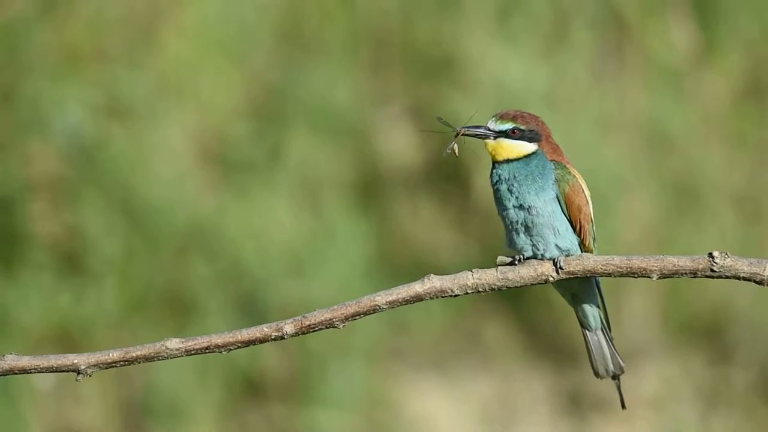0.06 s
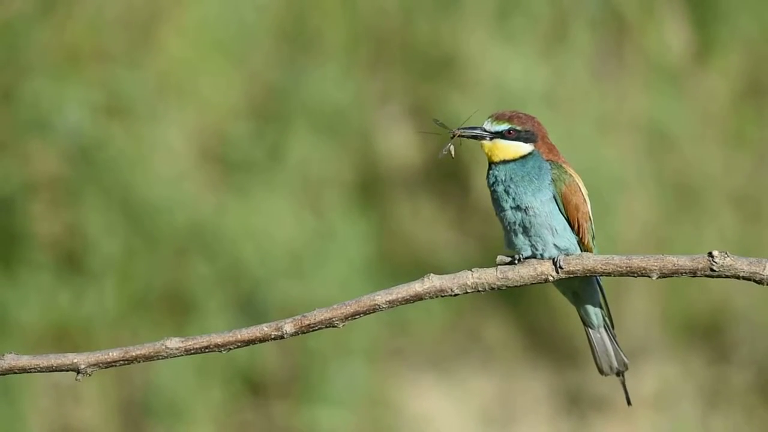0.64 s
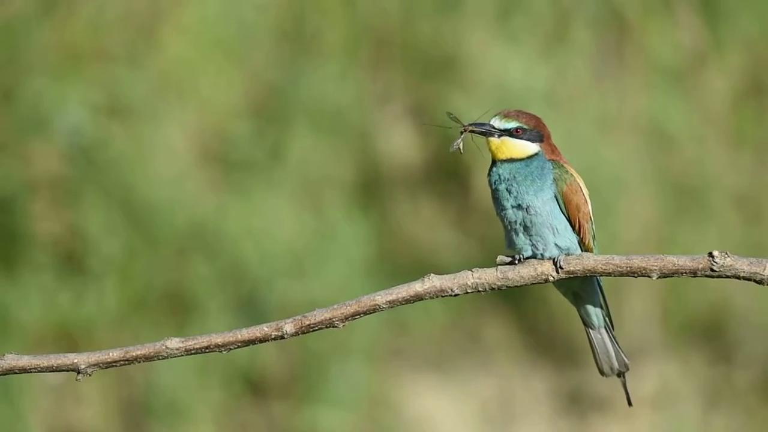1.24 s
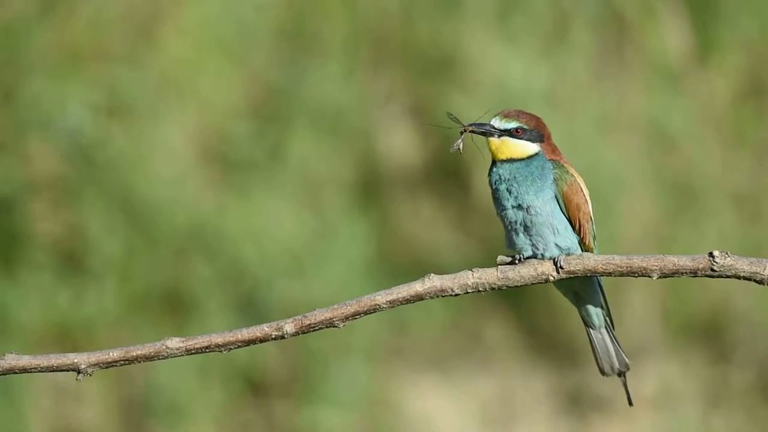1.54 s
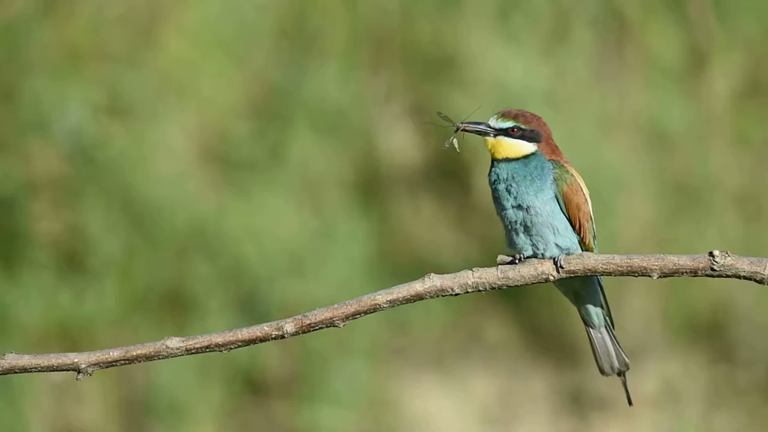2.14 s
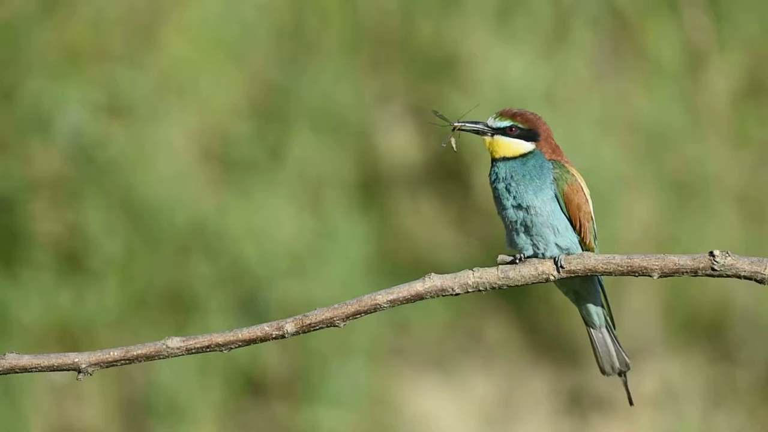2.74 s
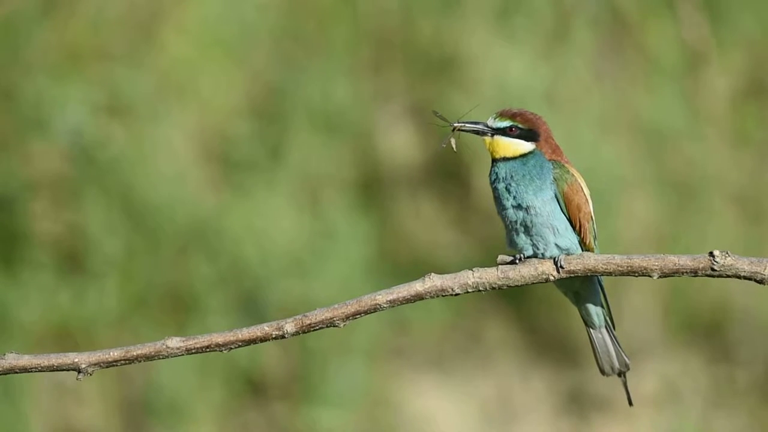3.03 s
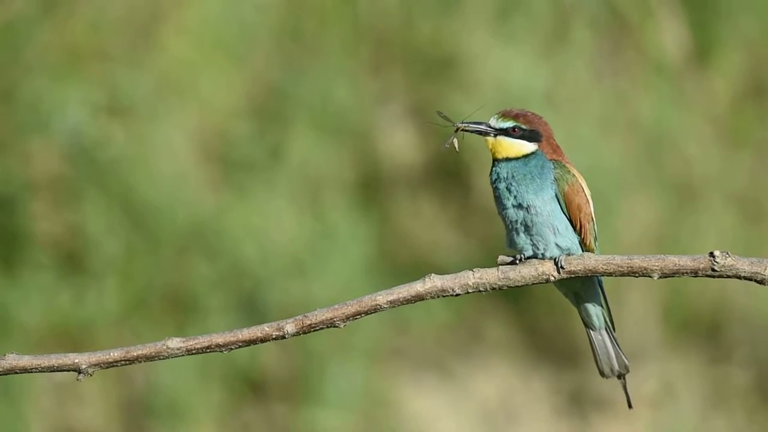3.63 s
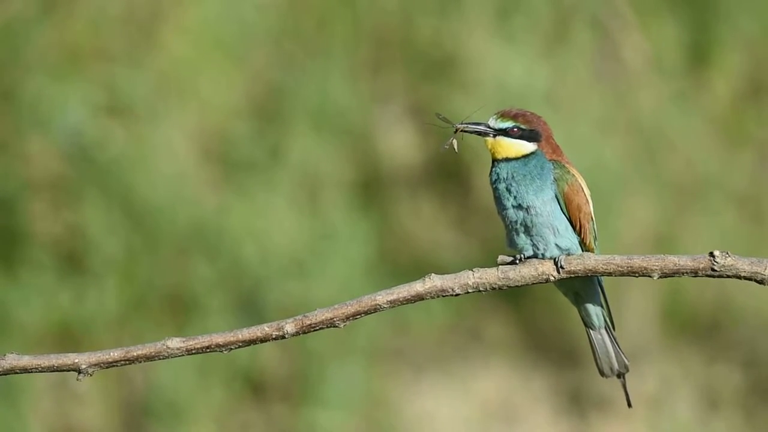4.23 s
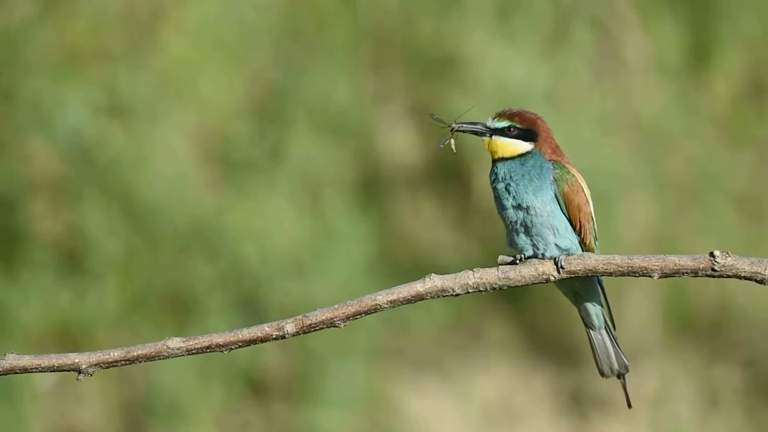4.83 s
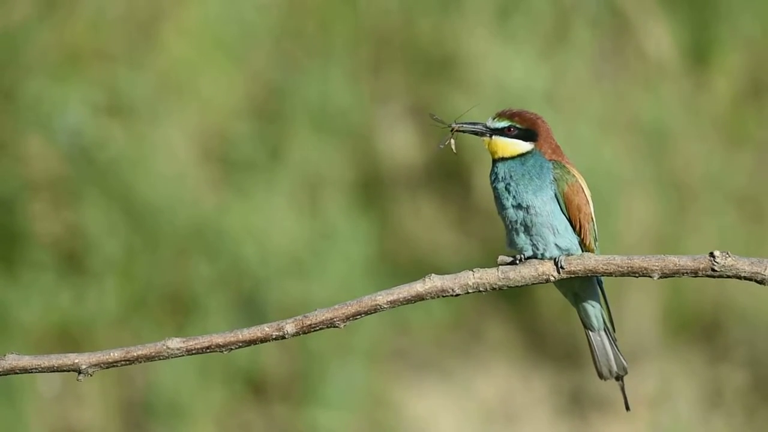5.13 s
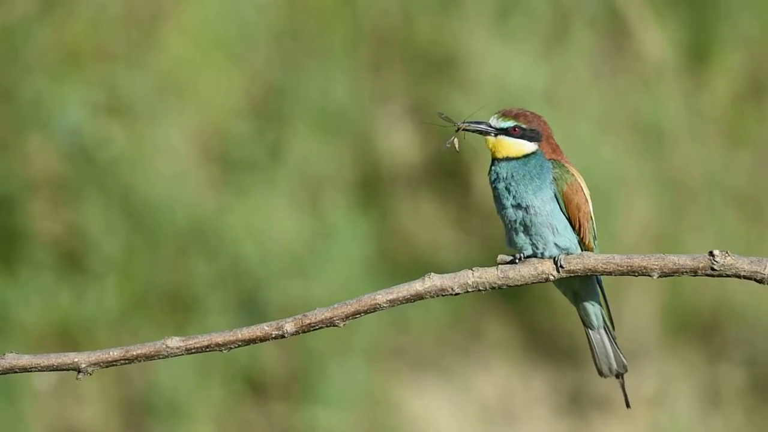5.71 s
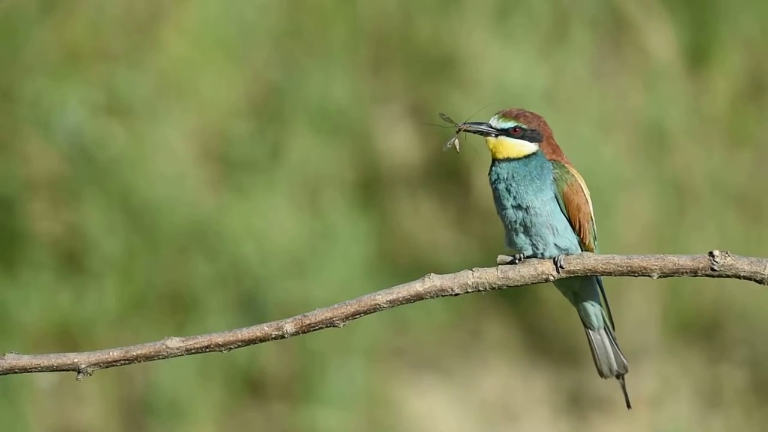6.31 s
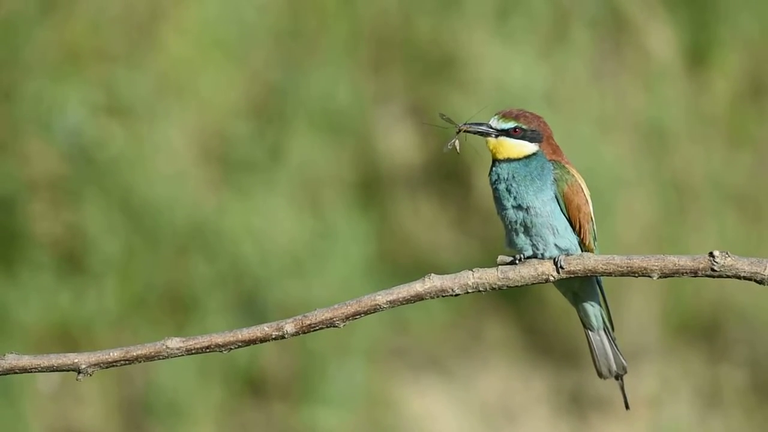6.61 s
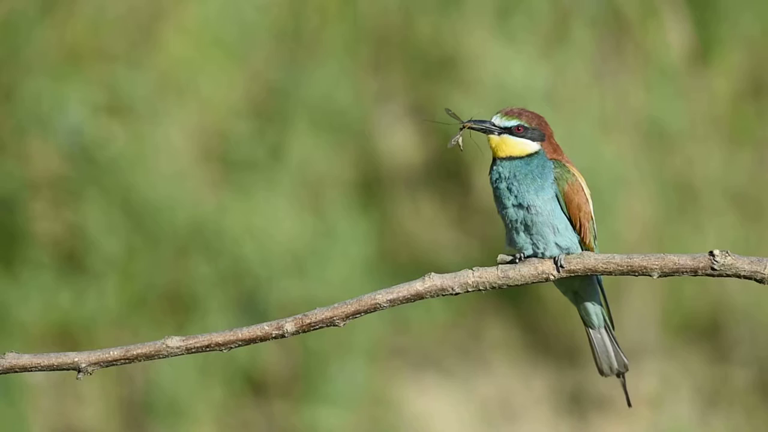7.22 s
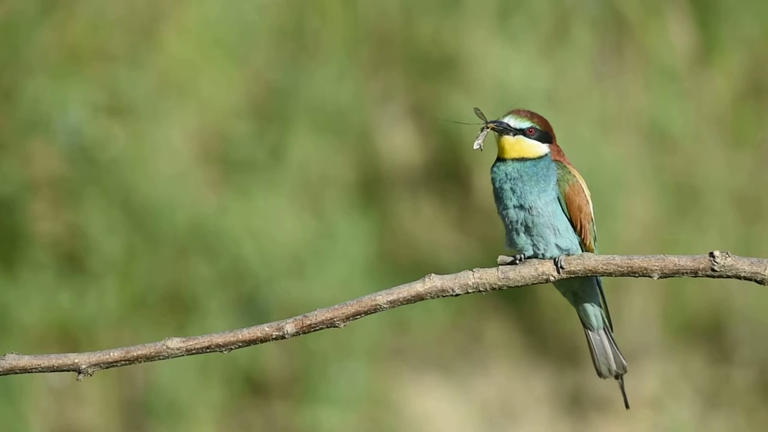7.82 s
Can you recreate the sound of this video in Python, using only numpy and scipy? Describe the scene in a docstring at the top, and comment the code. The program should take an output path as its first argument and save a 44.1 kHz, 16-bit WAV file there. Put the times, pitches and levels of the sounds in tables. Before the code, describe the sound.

A soft hiss of outdoor air and a low, distant rumble continue throughout. Bee-eaters nearby give short, nearly pure whistles that climb, flick upward and drop, each with a slight echo from the bushes. A faint call opens, a small dry snap sounds at 0.5 seconds, and clearer calls follow at about 0.7, 0.8, 1.4 and 1.6 seconds. A few tiny pips mix in between 2 and 2.4 seconds. The calls are then loudest and most regular, three or four a second, until about 4.8 seconds. After a pause, softer calls return from 5.9 to 6.6 seconds, with a strong one at 7. Small birds chirp, twitter and buzz faintly farther off, adding thin rising chirps around 4.3 and 5.5 seconds and high dropping whistles near 6.2, 7.1 and 7.9. Leaves rustle lightly around 3 and 5.5 seconds.

```python
"""Short, arching whistles ring out over a soft hiss and a low, distant rumble in open country.
They come from bee-eaters near a perch: each call is a nearly pure tone that climbs, flicks up
once or twice and drops. Small birds chirp and buzz farther off, something snaps once, and a
breeze rustles the leaves. The ground and the bushes scatter the calls back as echoes."""
import sys
import numpy as np
from scipy import signal
from scipy.fft import rfft, irfft
from scipy.io import wavfile

SR = 44100
rng = np.random.default_rng(int(sys.argv[2]) if len(sys.argv) > 2 else 0)


def output_pcm(signal):
    """Save a mono or channel-first signal as 16-bit PCM at the path in sys.argv[1].

    Samples are clipped to [-1, 1] before scaling.
    """
    pcm = np.clip(np.atleast_2d(signal).T, -1, 1) * 32767
    wavfile.write(sys.argv[1], SR, np.round(pcm).astype(np.int16))


N = 355446


def amp(db):
    """Turns decibels into a number to multiply a sound by."""
    return 10 ** (np.asarray(db) / 20)


def value_at(points, hz):
    """Looks up a value between the rows of a table, with every octave spaced alike."""
    row_hz, values = np.transpose(points)
    return np.interp(np.log(hz + 1), np.log(row_hz + 1), values)


def add(mix, start_s, sound):
    """Adds a sound to the mix at its start time."""
    part = mix[max(round(start_s * SR), 0):][:len(sound)]
    part += sound[:len(part)]


def noise(gain):
    """Noise of typical size 1; the function gain(hz) says how strong each frequency is."""
    shaped = irfft(rfft(rng.standard_normal(N)) * gain(np.fft.rfftfreq(N, 1 / SR)), N)
    return shaped / np.sqrt(np.mean(shaped ** 2) + 1e-20)


def wander(rate_hz):
    """A smooth random wobble of typical size 1, moving at up to about rate_hz."""
    return noise(lambda hz: np.exp(-(hz / rate_hz) ** 2))


def fade(t, length_s, edge_s):
    """Fades a note in and out, taking edge_s at each end."""
    return np.clip(np.minimum(t, length_s - t) / edge_s, 0, 1)


def phase_of(hz):
    """Adds up a changing pitch into the angle of a sine wave."""
    return 2 * np.pi * np.cumsum(hz) / SR


def still_air(level_db=-57.5, sway_db=0.05):
    """Outdoor air: a nearly steady hiss, stronger in the low notes."""
    # tone of the air: frequency_hz, relative_db
    tone = [(76, -36), (130, -1.5), (186, -5.5), (415, -9.5), (584, -10.5), (632, -11), (1000, -12),
            (1250, -13), (1500, -14.5), (1830, -15.5), (4500, -23), (5830, -25.5), (15600, -39)]
    # faint narrow bands in the hiss: frequency_hz, width_hz, lift_db
    bands = [(8440, 310, 3), (12150, 390, 3), (15500, 300, 4)]

    def gain(hz):
        lift_db = sum(db * np.exp(-((hz - middle) / width) ** 2) for middle, width, db in bands)
        return amp(value_at(tone, hz) + lift_db)

    return noise(gain) * amp(level_db + sway_db * wander(8.5))


def distant_rumble(rumble_db=-54.5, drone_db=-64.5, drone_hz=73.8, drone_width_hz=7.1):
    """Deep noise, with one narrow band that is heard as a wavering drone."""
    # tone of the rumble: frequency_hz, relative_db
    tone = [(12, -28), (27, -14), (45, -3), (65, -3.5), (75, 1), (82, -5.5), (92, 0.5), (105, -9),
            (135, -14.5), (180, -28), (400, -65)]
    rumble = noise(lambda hz: amp(value_at(tone, hz)))
    drone = noise(lambda hz: 1 / (1 + ((hz - drone_hz) / drone_width_hz) ** 2))
    return amp(rumble_db) * rumble + amp(drone_db) * drone


def leaves(flicker_db=1.0):
    """Leaves make a bright, flickering rustle that grows when the breeze lifts."""
    # loudness of the breeze in the leaves: time_s, level_db
    breeze = [(0, -79), (2.7, -82), (2.95, -67.5), (3.1, -61.5), (3.3, -70), (3.55, -67), (3.8, -70.5),
              (4.1, -80), (5.2, -77), (5.5, -64), (5.8, -66), (6.1, -75), (6.55, -84), (6.66, -66),
              (6.8, -77), (8.06, -82)]
    # tone of the rustle: frequency_hz, relative_db
    tone = [(500, -23), (2500, 5), (6500, -1), (9000, -4), (13000, -11), (16000, -30)]
    breeze_db = np.interp(np.arange(N) / SR, *np.transpose(breeze))
    rustle = noise(lambda hz: amp(value_at(tone, hz)))
    return amp(breeze_db + flicker_db * wander(40)) * rustle


def echoes(sound, first_s, last_s, fall_db, count=12):
    """Single echoes bounce off the ground and branches; later ones are weaker."""
    lateness = (np.arange(count) + rng.random(count)) / count
    delay_s = first_s + lateness * (last_s - first_s)
    bounces = np.zeros(SR // 4)
    bounces[(delay_s * SR).astype(int)] = rng.choice([-1., 1.], count) * amp(-fall_db * lateness)
    return signal.fftconvolve(sound, bounces / np.linalg.norm(bounces))[:N]


def bushes(sound, build_s=0.0037):
    """Foliage scatters a sound into a soft tail, each frequency dying at its own speed."""
    # time the tail takes to fall by 60 dB: frequency_hz, decay_s
    decay = [(1500, 0.35), (2500, 0.36), (6000, 0.33)]
    hz, t, bands = signal.stft(rng.standard_normal(SR // 2), SR, nperseg=256)
    dying = amp(-60 * t / value_at(decay, hz)[:, None])
    _, tail = signal.istft(bands * dying * np.minimum(t / build_s, 1), SR, nperseg=256)
    return signal.fftconvolve(sound, tail / np.linalg.norm(tail))[:N]


def gliding_notes(notes, arch, flutter_hz, pitch_swing, loudness_swing, jitter):
    """Notes slide along a slight arch as a flutter shakes them; swings are fractions (0.03 is 3%)."""
    out, tremble = np.zeros(N), wander(200)
    flutter = np.sin(phase_of(flutter_hz * (1 + .25 * wander(39.8))))
    for start_s, length_s, pitch_hz, glide, level_db in notes:
        t = np.arange(int(length_s * SR)) / SR
        now = np.minimum(int(start_s * SR) + np.arange(len(t)), N - 1)
        from_middle = t / length_s - .5
        smooth_hz = pitch_hz * (1 + glide * from_middle - arch * (2 * from_middle) ** 2)
        hz = smooth_hz * (1 + pitch_swing * flutter[now] + jitter * tremble[now])
        loudness = amp(level_db) * fade(t, length_s, 0.064 * length_s)
        add(out, start_s, loudness * (1 + loudness_swing * flutter[now]) * np.sin(phase_of(hz)))
    return out


def repeated_note(notes, shape, harmonics=((1, 0),)):
    """A bird repeats one note shape; harmonics are its tones: pitch_multiple, relative_db."""
    out = np.zeros(N)
    progress, pitch_ratio, shape_db = np.transpose(shape)
    for start_s, length_s, pitch_hz, level_db in notes:
        t = np.arange(int(length_s * SR)) / SR
        phase = phase_of(pitch_hz * np.interp(t / length_s, progress, pitch_ratio))
        tone = sum(amp(db) * np.sin(multiple * phase) for multiple, db in harmonics)
        loudness = amp(level_db + np.interp(t / length_s, progress, shape_db))
        add(out, start_s, loudness * fade(t, length_s, edge_s=0.0034) * tone)
    return out


def twitter_notes(notes_per_s=14, spread_octaves=.2, sink_per_s=2.46):
    """Lists brief sinking notes of random pitch and length, loosely spaced in time."""
    # bursts of very distant twitter, a second long at most: start_s, end_s, middle_hz, level_db
    bursts = [(0.621, 1.25, 3490, -66), (0.839, 1.1, 5390, -67), (5.251, 5.8, 3600, -69),
              (7.779, 8, 3400, -66)]
    notes = []
    for start_s, end_s, middle_hz, level_db in bursts:
        beats = np.arange(start_s, end_s, 1 / notes_per_s)
        for beat_s, (late, long, high) in zip(beats, rng.random((notes_per_s, 3))):
            length_s = np.interp(long, [0, 1], [.02, .05])
            hz = middle_hz * 2 ** (spread_octaves * (2 * high - 1))
            notes.append((beat_s + late / notes_per_s, length_s, hz, -sink_per_s * length_s, level_db))
    return notes


def chirps_and_overtone():
    """Faint chirps and twitter from afar, plus one brief, high overtone of a near bee-eater's call."""
    # far chirps and, at 0.858 s, the overtone: start_s, length_s, pitch_hz, glide_fraction, level_db
    notes = [(0, .044, 3100, -.02, -61.5), (.2, 0.14, 4160, 0, -65), (0.35, .075, 3506, -0.011, -61.5),
             (.615, .03, 3710, -0.15, -61), (0.71, 0.022, 3660, -0.077, -55.5),
             (0.735, 0.059, 3296, 0.03, -58.5), (0.858, .02, 5750, -.08, -61), (0.875, .037, 3810, 0, -58),
             (0.96, .092, 2900, -0.0047, -63), (1.17, 0.03, 3740, -.35, -59.5),
             (1.285, .047, 2970, -0.063, -62), (4.165, 0.05, 1563, -0.18, -52.5),
             (5.175, .035, 2630, -0.29, -55), (5.6, 0.03, 2900, -0.1, -57), (5.705, .025, 3450, -.16, -59),
             (5.925, 0.028, 3740, -0.15, -56.5), (6.43, 0.064, 2720, 0, -64), (6.695, 0.048, 1367, 0, -52),
             (6.75, 0.033, 2870, 0.0023, -55), (7.21, 0.14, 1363, -0.14, -59.5),
             (7.295, 0.052, 3240, -.02, -61)]
    return gliding_notes(notes + twitter_notes(), arch=0.013, flutter_hz=110.0,
                         pitch_swing=0.0035, loudness_swing=0.086, jitter=0.013)


def buzzes():
    """A distant songbird's notes flutter so fast and deeply that they buzz."""
    # buzzy notes: start_s, length_s, pitch_hz, glide_fraction, level_db
    notes = [(0.92, 0.12, 3710, 0.044, -60), (3.9, 0.19, 2990, -0.1, -63.5),
             (4.04, 0.12, 4290, -0.071, -61.5), (5.79, .16, 3120, -0.132, -59.5),
             (5.96, .073, 4380, 0.0046, -63)]
    return gliding_notes(notes, arch=0.0405, flutter_hz=74.8,
                         pitch_swing=0.03, loudness_swing=0.21, jitter=0.0272)


def nasal_notes():
    """A faint run of notes that sound only at two and three times their base pitch."""
    # nasal notes: start_s, length_s, base_pitch_hz, level_db
    notes = [(4.49, 0.071, 2050, -65.5), (4.65, 0.055, 2040, -62), (4.81, 0.063, 2005, -63.5),
             (4.965, 0.079, 2014, -62.5)]
    # their rise and dip: length_fraction, pitch_ratio, relative_db
    shape = [(0, .8, -0.5), (.35, .94, -7), (.65, 0.99, 1.5), (.85, 0.92, -5), (1, .92, -7)]
    return repeated_note(notes, shape, harmonics=[(2, -1), (3, 0)])


def rising_chirps():
    """High, pure chirps sweep upward and grow louder."""
    # chirps: start_s, length_s, top_pitch_hz, level_db
    notes = [(0.32, 0.049, 5740, -61), (3.035, 0.045, 5630, -63), (3.585, 0.04, 5980, -57),
             (4.29, .043, 5660, -51), (5.525, 0.051, 5940, -53)]
    # their climb: length_fraction, pitch_ratio, relative_db
    shape = [(0, .85, -3), (.65, 0.97, 1.5), (1, 1, 2.5)]
    return repeated_note(notes, shape)


def dropping_whistles():
    """High, pure whistles hold their pitch and then drop."""
    # whistles: start_s, length_s, pitch_hz, level_db
    notes = [(6.205, 0.091, 5020, -49.5), (7.14, 0.072, 4574, -45), (7.895, 0.081, 4600, -47.5)]
    # their hold and drop: length_fraction, pitch_ratio, relative_db
    shape = [(0, 0.93, -20), (.25, 0.98, -6), (.5, 0.98, -4), (.7, .98, -4), (.85, .95, 1.5),
             (1, 0.87, -12)]
    return repeated_note(notes, shape)


def snap(echo_s=0.0018, echo_db=-12, dull_hz=9000):
    """One blow rings very briefly and a nearby surface echoes it; distance dulls the treble."""
    # the dry snap: start_s, level_db
    blows = [(0.5213, -34.5)]
    # its ringing tones: pitch_hz, relative_db, decay_s (time to fall by 60 dB)
    tones = [(1390, -12, .004), (2700, 1.5, 0.0036), (4930, -2, 0.0011), (7100, -0.5, 0.0024)]
    t, out = np.arange(1024) / SR, np.zeros(N)
    ring = sum(amp(db - 60 * t / decay_s) * np.sin(2 * np.pi * hz * t) for hz, db, decay_s in tones)
    for start_s, level_db in blows:
        add(out, start_s, amp(level_db) * ring)
        add(out, start_s + echo_s, amp(level_db + echo_db) * ring)
    return signal.sosfilt(signal.butter(4, dull_hz, fs=SR, output="sos"), out)


def bee_eater_pips():
    """The bee-eaters give very short, pure notes that sink a little."""
    # pips: start_s, length_s, pitch_hz, level_db
    notes = [(2.042, 0.029, 1724, -36), (2.226, 0.01, 1476, -36.5), (2.362, 0.0095, 1560, -38.5),
             (2.383, 0.026, 1960, -33)]
    # their sinking course: length_fraction, pitch_ratio, relative_db
    shape = [(0, 1.028, -1.5), (.4, .99, -2.5), (1, .92, -3.5)]
    return repeated_note(notes, shape)


def bee_eater_calls(jitter=0.016, flutter_db=3.0, overtone_db=-46):
    """A whistle climbs an arch, flicks up and drops; the voice turns from low to full above its break."""
    # calls: start_s, climb_s, arch_top_hz, low_voice_db, full_voice_db, flick_lift_hz, crest_lift_hz
    calls = [(0.129, 0.049, 1815, -64, -56, 358, 295), (0.674, 0.021, 1589, -54.5, -34.5, 60, 265),
             (0.837, 0.031, 1660, -53, -33, 480, 363), (1.376, 0.068, 1925, -34, -39.5, 140, 240),
             (1.628, 0.07, 1842, -32.5, -37, 34, 250), (2.079, 0.036, 1786, -42, -39, 0, 136),
             (2.172, 0.044, 1300, -43.0, -43.0, 0, 226), (2.467, 0.083, 1883, -38, -31.5, 366, 298),
             (2.731, 0.072, 1826, -35.0, -33, 120, 198), (3.009, 0.065, 1910, -38.5, -29.5, 520, 207),
             (3.114, 0.052, 1923, -41.5, -34.0, -2, 179), (3.343, 0.087, 1950, -41.5, -36, 445, 0),
             (3.59, 0.077, 1757, -37.5, -29, 260, 221), (3.814, 0.079, 1780, -43, -31.5, 252, 200),
             (4.022, 0.07, 1804, -46.5, -35, 100, 216), (4.313, 0.073, 1680, -49, -40, 10, 270),
             (4.617, 0.072, 1950, -39.5, -31.0, 534, 168), (4.78, 0.057, 1545, -48.5, -43.0, 87, 320),
             (5.911, 0.053, 1557, -48.5, -44, 97, 366), (6.049, 0.042, 2100, -52, -52.5, 160, 58),
             (6.135, 0.065, 1602, -48.5, -38.5, 50, 280), (6.558, 0.057, 1766, -49, -44, 110, 194),
             (6.997, 0.065, 2023, -39.5, -29.5, 495, 140), (7.087, 0.054, 1584, -45.5, -49.5, 70, 349)]
    start_hz, end_hz, climb_bend, fall_bend = 1290, 1174, .46, 2.3
    crest_width_s, flick_lead_s, flick_width_s = 0.01357, .031, 0.00642
    break_hz, break_width_hz, swell_db_per_octave = 1810, 60, 16.5
    burr_hz, burr_swing = 124.7, .02  # a throaty roll in the pitch of the full voice
    out, tremble, flutter = np.zeros(N), wander(300), wander(100)
    burr = np.sin(phase_of(burr_hz * (1 + .2 * wander(29.6))))
    for start_s, climb_s, top_hz, low_db, full_db, flick_hz, crest_hz in calls:
        fall_s = .037 - .000018 * flick_hz  # the higher the flick, the sooner the call falls away
        t = np.arange(int((climb_s + fall_s) * SR)) / SR
        now = int(start_s * SR) + np.arange(len(t))
        past_crest = t - climb_s
        rising = start_hz + (top_hz - start_hz) * (t / climb_s) ** climb_bend
        falling = top_hz - (top_hz - end_hz) * abs(past_crest / fall_s) ** fall_bend
        # the pitch steps up to a flat crest; an eager call also flicks up just before it
        crest = crest_hz * np.exp(-(past_crest / crest_width_s) ** 4)
        flick = flick_hz * np.exp(-((past_crest + flick_lead_s) / flick_width_s) ** 2)
        hz = np.where(past_crest < 0, rising, falling) + crest + flick
        fullness = .5 + .5 * np.tanh((hz - break_hz) / break_width_hz)  # 0 is low voice, 1 is full
        octaves_below_break = -np.log2(np.minimum(hz / break_hz, 1))
        voice_db = low_db + (full_db - low_db) * fullness - swell_db_per_octave * octaves_below_break
        loudness = amp(voice_db + flutter_db * flutter[now]) * fade(t, climb_s + fall_s, edge_s=0.0051)
        phase = phase_of(hz * (1 + jitter * tremble[now] + burr_swing * fullness * burr[now]))
        add(out, start_s, loudness * (np.sin(phase) + amp(overtone_db) * np.sin(2 * phase)))
    return out


def scene():
    """Near sounds arrive mostly direct; the faint notes come with more echo from the bushes."""
    near = bee_eater_calls() + bee_eater_pips() + snap()
    near_echoes = amp(-7.5) * echoes(near, first_s=.006, last_s=.04, fall_db=26.5)
    near_tail = amp(-18.5) * bushes(near)
    faint = chirps_and_overtone() + buzzes() + nasal_notes() + rising_chirps() + dropping_whistles()
    faint_echoes = amp(-6) * echoes(faint, first_s=.005, last_s=.04, fall_db=25)
    faint_tail = amp(-7) * bushes(faint)
    background = still_air() + distant_rumble() + leaves()
    mix = background + amp(-1) * faint + faint_echoes + faint_tail + near + near_echoes + near_tail
    return mix[None]


def record(dry):
    """Cuts away the very highest treble."""
    cutoff_hz = 15720
    low_pass = signal.firwin(511, cutoff_hz, window=("kaiser", 9), fs=SR)
    return signal.oaconvolve(dry, low_pass[None], "same")


dry = scene()
out = record(dry)
output_pcm(out)
```